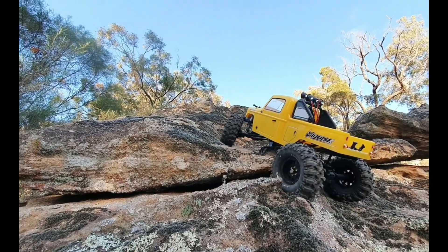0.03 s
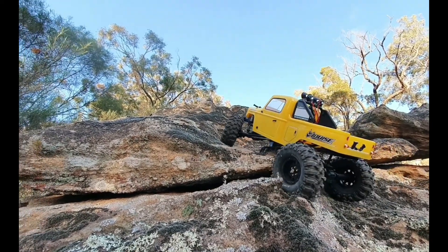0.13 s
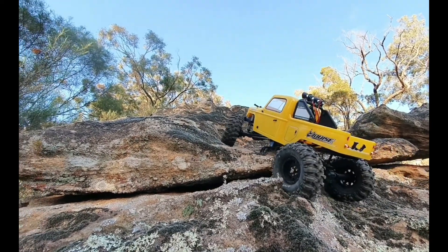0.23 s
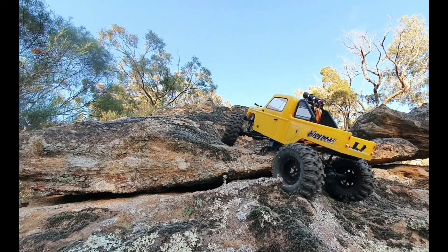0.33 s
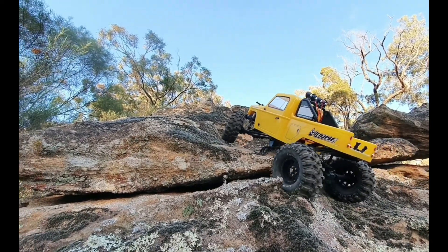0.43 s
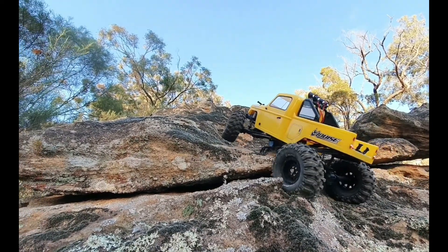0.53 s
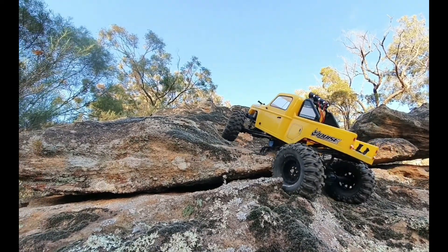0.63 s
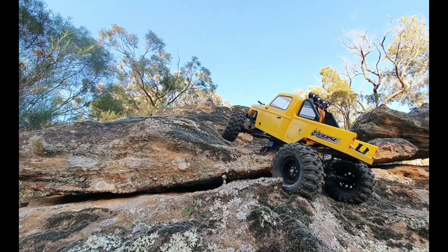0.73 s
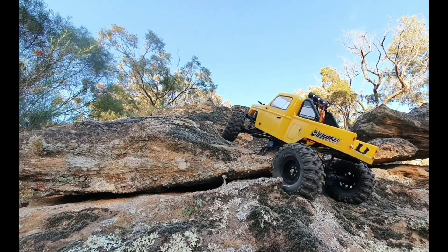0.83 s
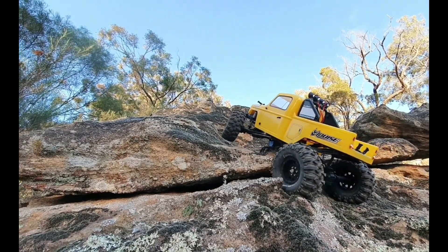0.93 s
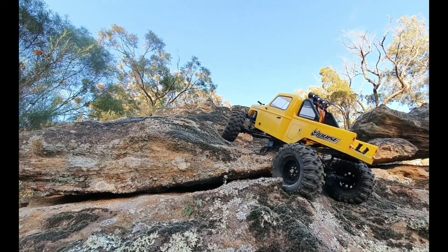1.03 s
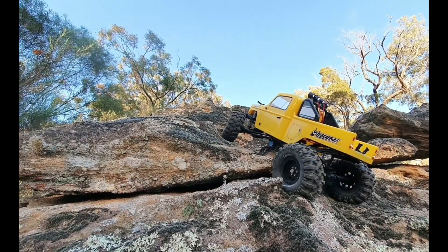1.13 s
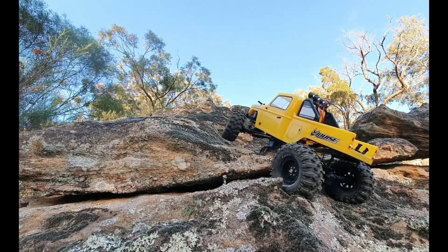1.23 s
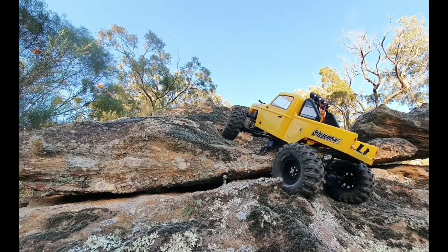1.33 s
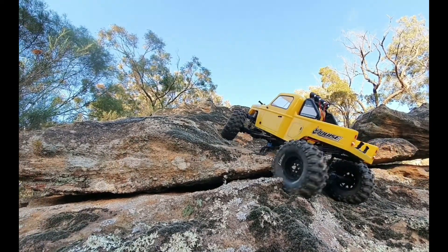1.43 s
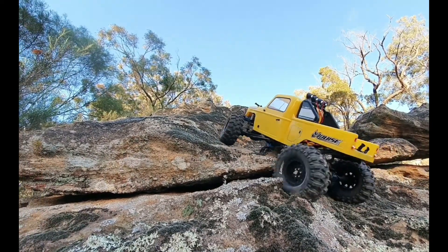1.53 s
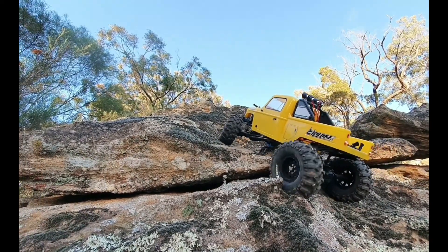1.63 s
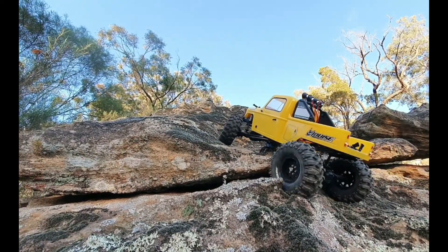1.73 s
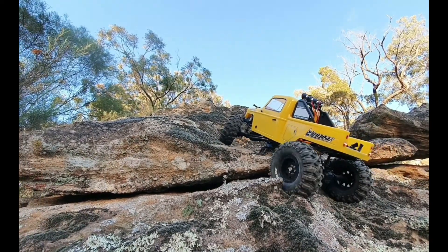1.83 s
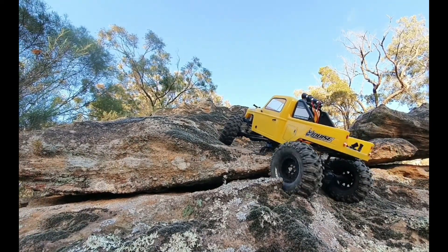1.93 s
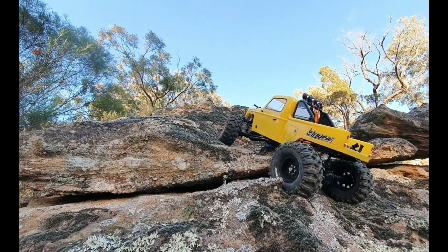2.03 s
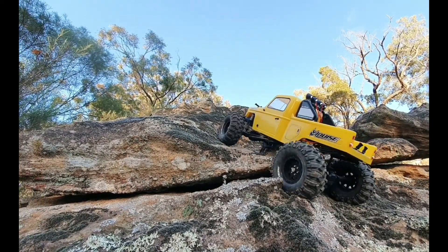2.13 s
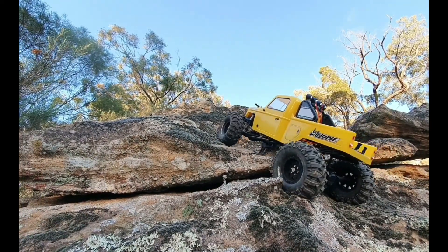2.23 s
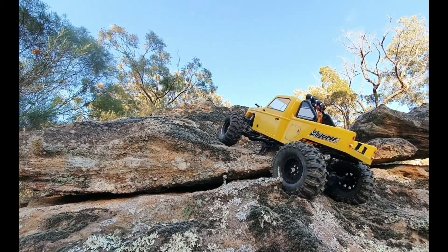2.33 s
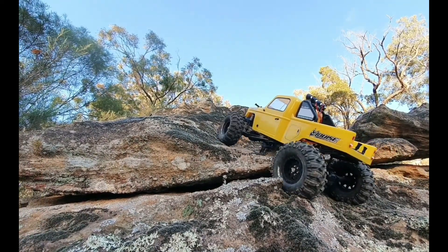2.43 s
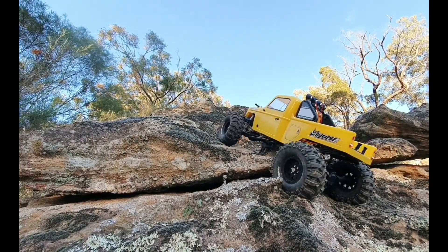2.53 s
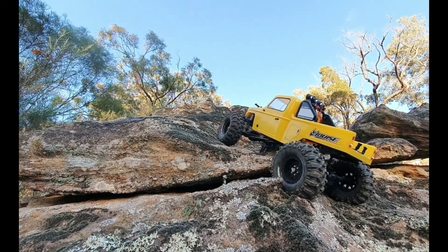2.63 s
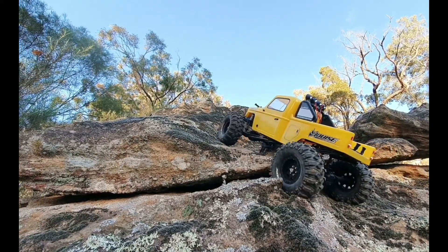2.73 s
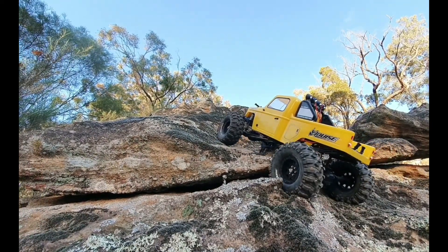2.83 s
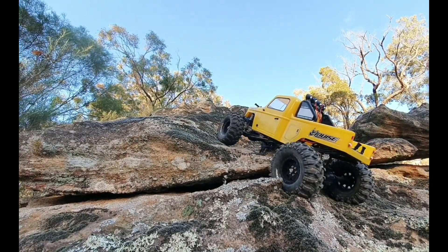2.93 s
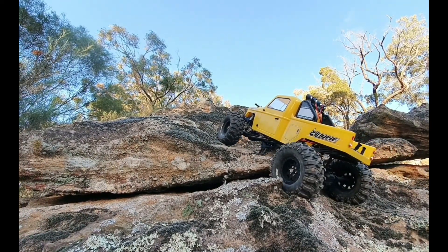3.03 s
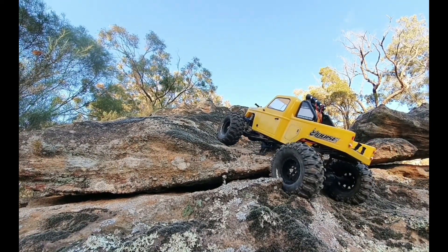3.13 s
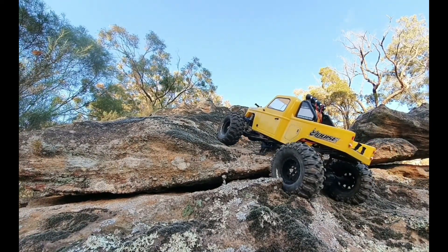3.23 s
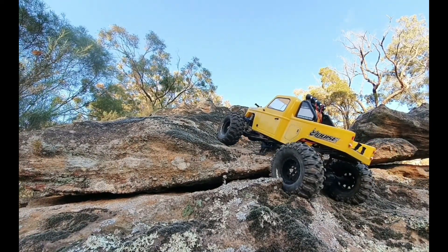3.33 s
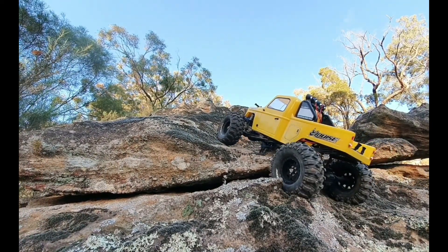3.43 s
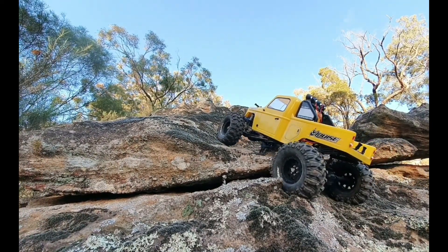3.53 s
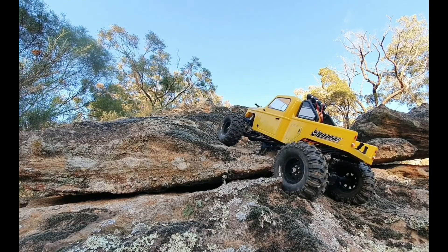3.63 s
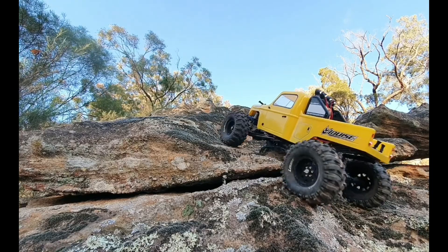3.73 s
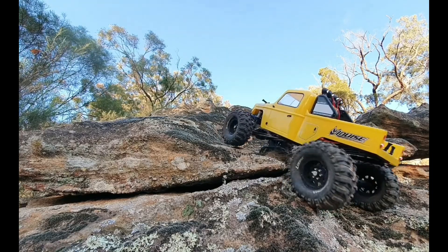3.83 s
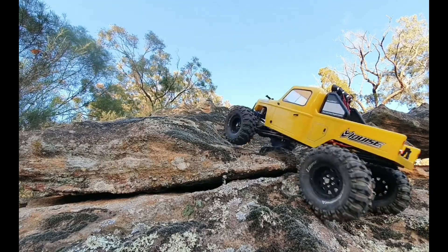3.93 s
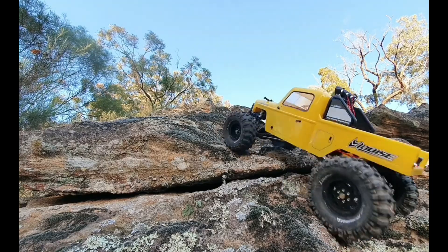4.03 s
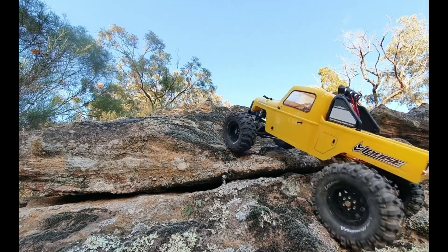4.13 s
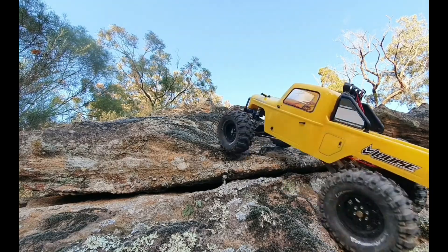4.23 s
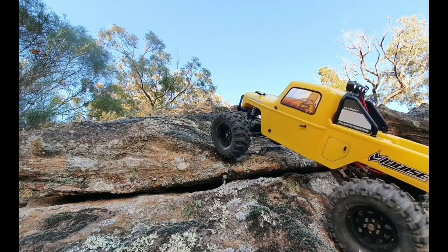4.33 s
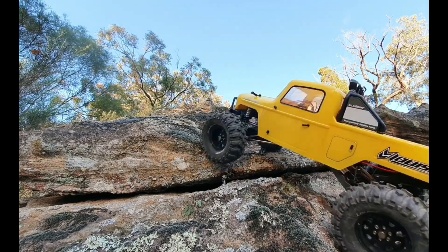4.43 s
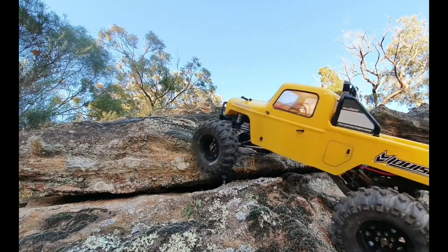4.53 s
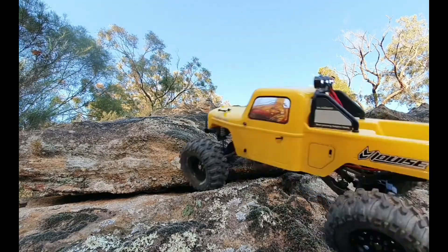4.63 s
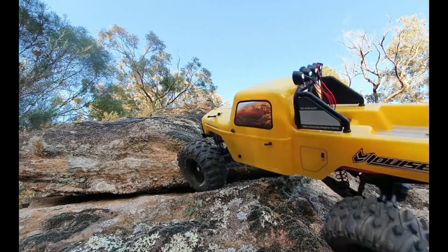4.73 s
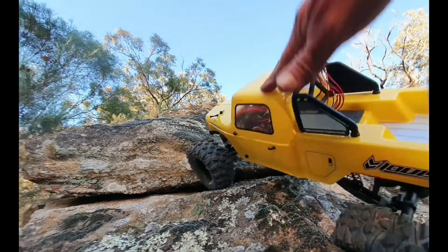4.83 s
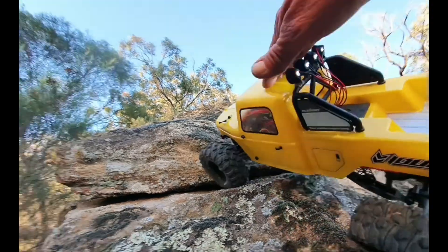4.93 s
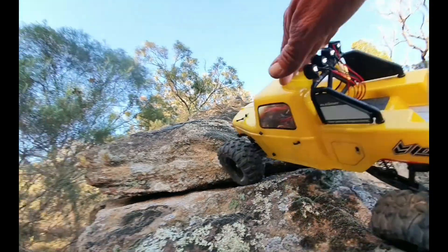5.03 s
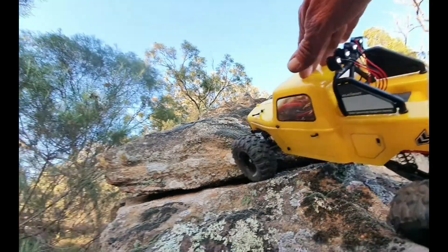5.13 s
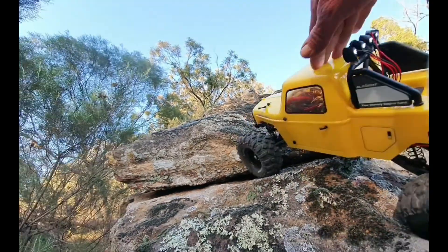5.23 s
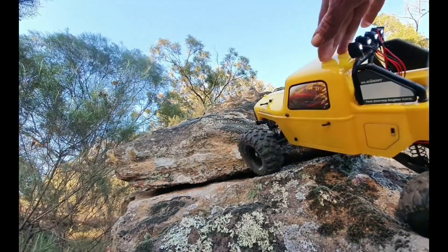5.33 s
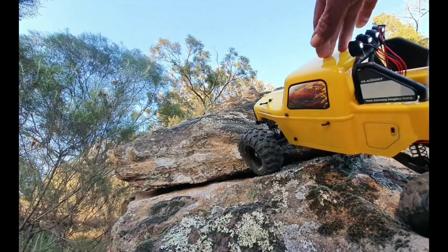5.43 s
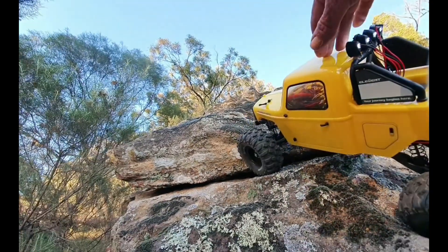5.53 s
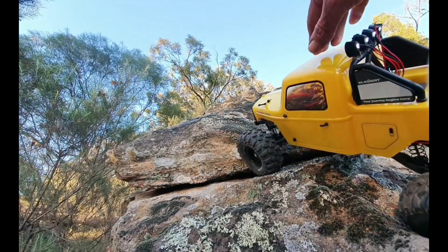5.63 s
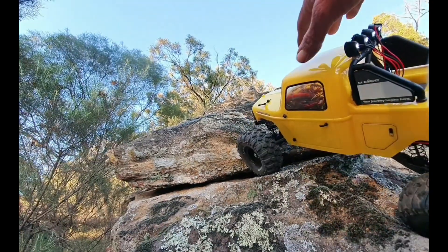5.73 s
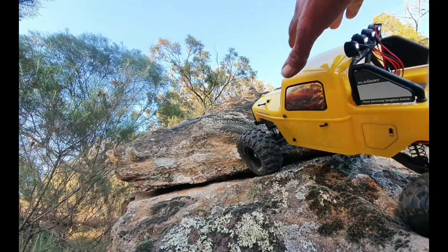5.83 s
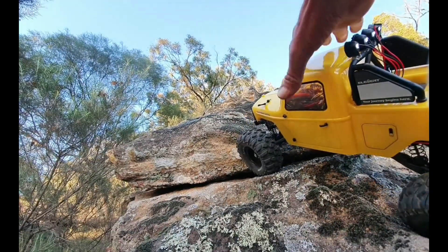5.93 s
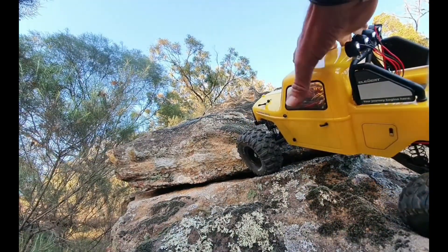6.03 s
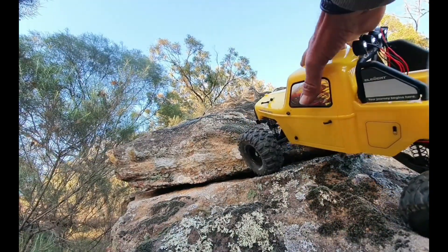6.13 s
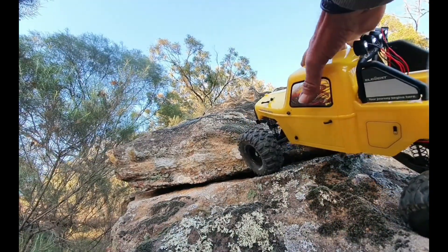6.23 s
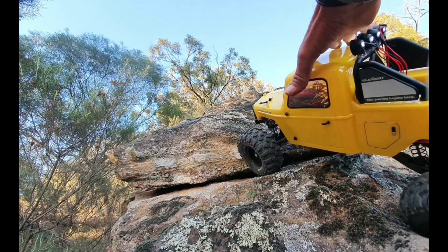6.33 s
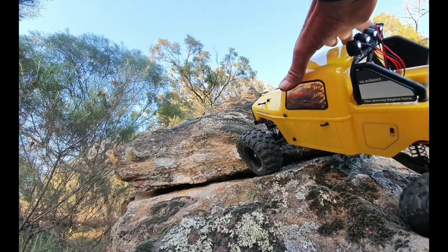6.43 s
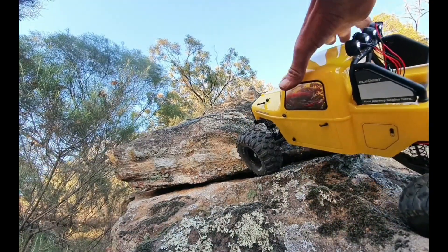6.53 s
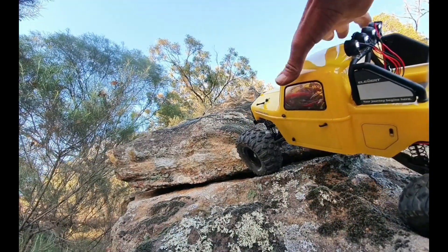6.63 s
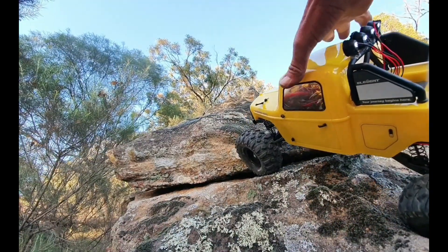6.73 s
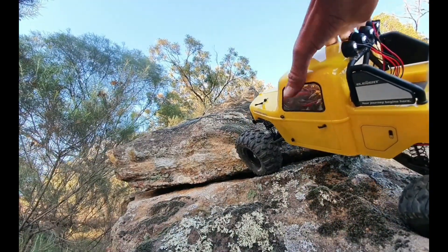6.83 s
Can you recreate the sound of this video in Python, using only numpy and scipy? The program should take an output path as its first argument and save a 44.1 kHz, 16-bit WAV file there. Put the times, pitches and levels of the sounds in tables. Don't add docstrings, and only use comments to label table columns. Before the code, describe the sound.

A model crawler truck's rubber tyres scrabble and thump on sandstone in bursts, stones cracking, then slide back into one hard plastic knock.

```python
import sys
import numpy as np
from scipy import signal
from scipy.fft import rfft, irfft, next_fast_len
from scipy.io import wavfile
from scipy.ndimage import uniform_filter1d, map_coordinates

SR = 44100
rng = np.random.default_rng(int(sys.argv[2]) if len(sys.argv) > 2 else 0)


def linear_from_db(decibels):
    return 10 ** (np.asarray(decibels, float) / 20)


def transcribe(u):
    v = np.clip(np.atleast_2d(u).T, -1, 1)
    q = np.round(v * 32767).astype(np.int16)
    wavfile.write(sys.argv[1], SR, q)


N = 303716

# (peak time [s], peak level [dB], rise [s], fall [s], harshness [dB])
CLIMB = [(.058, -57.5, 1.1, 0.11, 0), (.17, -73.5, .12, 0.34, 10), (.46, -77, 0.14, 0.71, 12.5),
         (.59, -59.5, 0.3, 0.65, 1.5), (.735, -54.5, 0.15, 0.29, 2.5), (1.545, -49.5, 0.042, 0.3, 0),
         (1.6, -46.5, 0.084, 0.5, -9), (1.7, -41, 0.16, 0.23, 4), (1.45, -76, 0.031, 0.13, -7),
         (1.8, -35, 0.14, 0.17, 4.5), (1.96, -57.5, 0.041, 0.056, 3.5), (2.02, -59, 0.064, 0.023, -7.5),
         (2.18, -55.5, 0.022, 0.31, -0.5), (2.275, -47, 0.084, .14, -3), (2.32, -51, 0.11, 0.084, 2.5),
         (2.97, -65.5, .03, 0.19, -10), (3.035, -68, 0.16, 0.17, 3.5), (1.875, -41.5, 0.039, 0.039, -0.5),
         (2.0, -81, 3.9, 4.7, 0.5)]
# (peak time [s], peak level [dB], rise [s], fall [s], harshness [dB])
SLIDE = [(3.85, -59.5, 0.075, 1, 0.5), (3.94, -58.5, 0.034, 0.41, 2), (4.018, -50, 0.087, 0.13, 0),
         (4.17, -63.5, 0.083, 0.4, 6), (4.3, -52.5, 0.12, 0.097, 2), (4.235, -59, .02, .12, 1),
         (4.41, -54.5, 0.076, 0.11, 3.5), (4.483, -49, 0.057, 0.2, 2), (4.69, -53, 0.053, 0.11, 7),
         (4.77, -38.5, 0.083, 0.056, -15), (4.81, -49.5, 0.084, 0.015, -7), (4.86, -41, 0.031, 0.12, 5.5),
         (4.93, -46.5, 0.41, 0.033, 0), (4.96, -62, .02, 0.27, 8.5), (5.067, -25.5, 0.013, 0.045, 10.5),
         (5.107, -39.5, 0.029, 0.084, 1.5), (5.24, -67, .1, 0.49, 2), (5.384, -61, 0.18, 0.091, 1),
         (5.57, -66.5, .2, 0.22, -1.5), (5.48, -70.5, .1, .1, -1), (6.33, -70, 0.14, 0.56, 1),
         (6.359, -52, 0.02, 0.079, -7), (6.482, -64, 0.14, 0.08, 1), (6.58, -79, .08, 0.27, -16)]


def unit(x):
    return x / np.sqrt(np.mean(x ** 2) + 1e-20)


def along(points, hz):
    f, v = np.transpose(points)
    return np.interp(np.log(hz + 1), np.log(f + 1), v)


def wobble(rate):
    knots = rng.standard_normal(int(N * rate / SR) + 4)
    return map_coordinates(knots, [np.arange(N) * rate / SR])


def filtered(x, response):
    m = next_fast_len(N + SR // 2)
    return irfft(rfft(x, m) * response(np.fft.rfftfreq(m, 1 / SR)), m)[..., :N]


def band(lo_hz, hi_hz, order=2):
    return lambda f: (1j * f / (lo_hz + 1j * f) * hi_hz / (hi_hz + 1j * f)) ** order


def resonance(f, centre_hz, width_hz, lift_db):
    damping = 1j * f * width_hz
    return (linear_from_db(lift_db) - 1) * damping / (centre_hz ** 2 - f * f + damping)


def noise(alike):
    a, b = rng.standard_normal((2, N))
    turn = np.arccos(np.clip(alike, -1, 1)) / 2
    common, apart = np.cos(turn) * a, np.sin(turn) * b
    return np.array([common + apart, common - apart])


def swells(rows, share=0, slope=1):
    s, db, rise, fall, extra_db = np.transpose(rows)[..., None]
    t = np.arange(0, N + 64, 64) / SR
    away = np.maximum((s - t) / np.abs(rise), (t - s) / np.abs(fall))
    each = linear_from_db(slope * db + share * extra_db - 20 * away)
    return np.interp(np.arange(N) / SR, t, 10 * np.log10((each ** 2).sum(0) + 1e-14))


def grains(s, db, hz, cycles, pan_db, lag, size, rise=0):
    t = np.arange(size) / SR
    decay = np.exp(-t * (hz / cycles)[:, None] * 2)
    wave = linear_from_db(db)[:, None] * decay * np.sin(2 * np.pi * hz[:, None] * t)
    wave *= np.hanning(2 * size)[size:] * (1 - np.exp(-t * hz[:, None] / (rise + 1e-3)))
    out = []
    for side in (1, -1):
        at = np.round(s * SR + side * lag / 2).astype(int)[:, None] + np.arange(size)
        heard = wave * linear_from_db(side * pan_db / 2)[:, None]
        out.append(np.bincount(at.clip(0, N).ravel(), heard.ravel(), N + 1)[:N])
    return np.array(out)


def swarm(count, hz, octaves, cycles, spread_db, pan_db, size):
    u, g = rng.random((count, 2)), rng.standard_normal((count, 4))
    pitch = np.clip(hz * 2 ** (octaves * g[:, 0]), 100, SR / 2.5)
    life = cycles * 2 ** (.5 * g[:, 1])
    size_db = np.minimum(-spread_db * np.log(u[:, 1]), 11)
    pan, lag = pan_db + 3 * g[:, 2], 9 + 4 * g[:, 3]
    return unit(grains(u[:, 0] * N / SR, size_db, pitch, life, pan, lag, size=size))


def bursts(rows, gain_db, pan_db, octaves, cycles, smear, count, size, rise=0):
    s, db, hz = np.repeat(np.array(rows), count, axis=0).T
    g = rng.standard_normal((len(rows), count, 4)) * (np.arange(count) > 0)[:, None]
    g = g.reshape(-1, 4)
    pitch = np.clip(hz * 2 ** (octaves * g[:, 0]), 100, 11000)
    late = smear * (1.3 + g[:, 1])
    level, lag = db + gain_db + 1.0 * g[:, 2], 9 + 1.8 * g[:, 3]
    return grains(s + late, level, pitch, cycles + 0 * s, pan_db + 0 * s, lag, size=size, rise=rise)


def singing(rows, width_hz, steady):
    out = np.zeros(N + SR)
    for s, length, hz, db in rows:
        n = round(length * SR)
        rate = width_hz * np.sqrt(hz / 2000)
        shake = steady + (wobble(rate) + 1j * wobble(rate))[:n] / 2
        tone = (shake * np.exp(2j * np.pi * hz * np.arange(n) / SR)).real
        out[round(s * SR):][:n] += linear_from_db(db + 3.5) * np.sqrt(np.hanning(n)) * tone
    return np.array([linear_from_db(-1.5) * np.roll(out[:N], 9), linear_from_db(5.5) * out[:N]])


def leaves():
    # (frequency [Hz], level per Hz [dB])
    air_colour = [(76, -32), (130, -3.5), (183, -4.5), (554, -11.5), (1080, -20.5), (4240, -26.5),
                  (10000, -38.5), (16000, -33.5)]
    hiss = unit(filtered(noise(0.089), lambda f: linear_from_db(along(air_colour, f))))
    return linear_from_db(-74 + 0.56 * wobble(2.0)) * hiss


def mount():
    # (peak time [s], hum level [dB], rise [s], fall [s], wind over hum [dB])
    shake_events = [(0, -61, .5, 1.8, -5), (.82, -50.5, 0.4, 0.61, -10), (1.15, -64, 0.34, 0.14, -1),
                    (1.45, -51, 0.13, 0.38, -12.5), (1.66, -49, 0.18, 0.14, -2.5),
                    (1.84, -43, 0.071, 0.16, -1.5), (2.07, -51.5, 0.57, 0.26, -10.5),
                    (2.3, -51.5, 0.33, 0.18, -3), (2.6, -61.5, 0.15, 0.12, 1), (2.9, -74.5, 0.37, .6, -7),
                    (3.22, -55, 0.87, 0.21, -5), (3.55, -58.5, 0.18, 0.089, -0.5),
                    (3.87, -52, 0.36, 0.28, -5), (4.5, -58, 0.92, 0.71, -3), (4.77, -39.5, 0.072, .25, 0.5),
                    (5.15, -48, 0.11, 0.11, 5), (5.4, -61.5, 0.18, 0.11, 1), (5.58, -65.5, 0.095, 0.32, 7),
                    (5.94, -79.5, 0.23, 0.28, 13.5), (6.44, -63, 0.49, 0.13, 5),
                    (6.67, -65.5, 0.21, 0.61, -2)]
    hum_db, buffet_db = swells(shake_events), swells(shake_events, share=0.99)
    via_rock_db = -9.5 + uniform_filter1d(swells(CLIMB + SLIDE), SR // 20)
    via_hand_db = -31.5 + hum_db
    rumble = linear_from_db(via_rock_db) + linear_from_db(via_hand_db)
    hum_hz = 90.1 + 1.8 * wobble(14)
    hum = np.sin(2 * np.pi * np.cumsum(hum_hz) / SR) * linear_from_db(3.2 * wobble(7.0))
    clear = np.interp(np.arange(N) / SR, [4.0, 4.2], [1, 0.3])
    hum = clear * unit(hum) + (1.18 - clear) * unit(filtered(noise(0.64), band(78, 100, order=6)))
    buffet = linear_from_db([[2.5], [-2.5]]) * unit(filtered(noise(0.79), band(38, 58, order=4)))
    handling = unit(filtered(noise(.75), lambda f: 1 / (1 + ((f - 138) / 28) ** 4)))
    hum = linear_from_db([[.6], [-.6]]) * linear_from_db(hum_db + 0.55) * hum
    return hum + linear_from_db(buffet_db + 5.5) * buffet + rumble * handling


def controller():
    # (on time [s], off time [s], whistle at on [dB], whistle at off [dB])
    throttle = [(0, 0.125, -77, -77), (.15, 0.397, -85, -78.5), (0.414, .92, -80.5, -69.5),
                (0.944, 0.991, -67, -64.5), (1.016, 1.453, -68, -71), (1.471, 1.768, -74, -59.5),
                (1.8, 2.037, -76, -77), (2.056, 2.174, -71, -100), (2.745, 3.112, -88.5, -80),
                (3.35, 3.45, -95, -95), (3.788, 3.901, -82.5, -66.5), (3.916, 4.056, -70, -81)]
    chop_hz, switch_s = 9661, 0.03
    t = np.arange(N) / SR
    pulls = []
    for on, off, on_db, off_db in throttle:
        times = [on - switch_s, on, off, off + switch_s]
        pulls.append(np.interp(t, times, [-120, on_db, off_db, -120]))
    db = np.max(pulls, 0)
    phase = 2 * np.pi * chop_hz * t + 1.3 * wobble(25)
    beat = 1 + 0.23 * np.sin(2 * np.pi * 170 * t + 3 * wobble(7.4))
    left = linear_from_db(-3.5) * np.sin(phase - 1.3 + 0.5 * wobble(3.7))
    right = linear_from_db(3.5) * np.sin(phase)
    tone = beat * np.array([left, right])
    fuzz = unit(filtered(noise(0.27), lambda f: 1 / (1 + ((f - chop_hz) / 400) ** 2)))
    return linear_from_db(db + 6.5 + 1.5 * wobble(40)) * tone + linear_from_db(0.41 * db - 50.5) * fuzz * (db > -105)


def tyres():
    # (frequency [Hz], width [Hz], level over flat [dB])
    chassis_modes = [(1800, 280, -0.5), (2660, 300, 2.5), (3366, 260, 1.5), (4870, 630, -0.5),
                     (6360, 69, 4)]
    slips = CLIMB + SLIDE
    thump_db = swells(slips)
    scrape_db = -21.5 + swells(slips, share=0.7, slope=0.82)
    grit_db = -33 + swells(slips, share=0.8, slope=0.66)
    judder = 1.6 * wobble(30)
    patches = 2.0 * np.array([wobble(45), wobble(45), wobble(45)])
    fine = judder + 2.0 * wobble(70)
    right = linear_from_db([[-1.8], [1.8]])

    def frame(f):
        return 1 + sum(resonance(f, *mode) for mode in chassis_modes)

    lugs = swarm(count=3500, hz=600, octaves=0.68, cycles=2.2, spread_db=1.0, pan_db=-4, size=600)
    lugs = unit(filtered(lugs + 0.76 * right * noise(0.41), band(298, 1900)))
    rub = swarm(count=9000, hz=2121, octaves=0.83, cycles=2, spread_db=2.0, pan_db=-5.0, size=200)
    rub = rub + 0.59 * right * noise(0.033)
    rub = unit(filtered(rub, lambda f: frame(f) * band(1100, 4200)(f)))
    grit = swarm(count=12000, hz=7106, octaves=0.9, cycles=1.1, spread_db=2.0, pan_db=-9.5, size=60)
    grit = grit + 1.0 * right * noise(0.04)
    grit = unit(filtered(grit, lambda f: frame(f) * band(4200, 7000)(f)))
    out = linear_from_db(thump_db + judder + patches[0] - 1.0) * lugs
    out += linear_from_db(scrape_db + fine + patches[1] + 3.5) * rub
    return out + linear_from_db(grit_db + fine + patches[2] + 4.0) * grit


def sand():
    # (time [s], peak level [dB], frequency [Hz])
    snap_events = [(.034, -58, 3000), (.0545, -37.5, 3040), (.0765, -57, 6000), (.147, -55, 5000),
                   (.1745, -58, 5000), (.185, -55, 4000), (.2025, -50, 5030), (.2712, -52.5, 4500),
                   (.288, -57, 5000), (.297, -53, 9000), (.4185, -64, 3000), (.422, -56, 6000),
                   (.462, -66, 5500), (.52, -53, 9000), (.613, -50, 9000), (.68, -62, 6600),
                   (.7128, -49, 9000), (.727, -35.5, 8020), (.76, -58, 6480), (.815, -56, 6000),
                   (.83, -45, 10000), (.887, -57, 11010), (.902, -59, 11000), (1.569, -45.5, 3500),
                   (2.39, -56, 3500), (5.21, -57, 2400), (5.3, -62, 7000), (5.353, -58, 3000),
                   (5.38, -55, 6540), (5.55, -59, 2000), (5.6, -65, 6500), (5.71, -66, 1200),
                   (4.354, -50, 1800), (4.822, -48, 4000)]
    return bursts(snap_events, gain_db=2.5, pan_db=-9.5, octaves=0.35, cycles=2.9, smear=0.00049,
                  count=6, size=120, rise=0.84)


def contacts():
    # (time [s], peak level [dB], frequency [Hz])
    lug_events = [(0.052, -47, 533), (0.68, -49, 474), (0.769, -45.5, 495), (0.801, -47, 519),
                  (1.535, -45, 394), (1.564, -51, 507), (1.602, -28, 554), (1.664, -39, 600),
                  (1.741, -26, 817), (1.758, -18, 690), (1.799, -26, 471), (2.28, -48, 500),
                  (3.838, -50, 810), (3.943, -33.5, 716), (3.9893, -29, 429), (4.171, -37, 422),
                  (4.229, -43.5, 940), (4.301, -39, 387), (4.263, -48.5, 377), (4.549, -49.5, 458),
                  (4.469, -38, 405), (4.674, -47, 824), (4.717, -35, 433), (4.745, -24.5, 435),
                  (4.8, -22.5, 428), (4.855, -28, 448), (4.894, -26.5, 512), (4.921, -29.5, 412),
                  (4.955, -40, 396)]
    # (time [s], peak level [dB], frequency [Hz])
    settle_events = [
        (5.105, -26, 315),
        (5.264, -49, 740),
        (5.354, -45.5, 274),
        (5.574, -56, 486),
        (6.307, -56.5, 604),
        (6.352, -45.5, 317),
        (6.486, -49, 285),
    ]
    # (time [s], peak level [dB], frequency [Hz])
    crack_events = [(0.038, -44, 2860), (0.0525, -41, 3020), (0.7115, -49, 3600), (0.7257, -41, 3110),
                    (1.5254, -47.5, 3810), (1.543, -50, 3450), (1.563, -38.5, 2520), (1.6836, -39, 2650),
                    (1.735, -31.5, 2690), (1.7519, -28.5, 4200), (1.8177, -27, 4230), (1.8854, -37, 2720),
                    (1.9634, -42.5, 3270), (2.2794, -39, 5100), (2.333, -39.5, 3000), (3.9454, -39.5, 2780),
                    (4.4094, -50, 3800), (4.466, -38.5, 4660), (4.7547, -38.5, 3700), (4.801, -28, 5300),
                    (4.8566, -35, 3620), (4.8676, -38, 4350), (4.9014, -36, 3516), (5.0612, -29, 2200),
                    (5.0669, -27.5, 2492), (5.1048, -33, 2780), (5.1464, -36.5, 3150), (5.2826, -46, 2430)]
    # (time [s], peak
    # level [dB], frequency [Hz])
    further_cracks = [(5.052, -45, 3100), (5.055, -42, 2100), (5.058, -38, 1650), (1.794, -37, 3000),
                      (4.92, -39, 2000), (4.19, -54, 2000), (4.801, -29, 5500), (.9935, -58, 3600),
                      (5.328, -56, 6000), (5.407, -56, 3000), (6.38, -55, 2400), (6.411, -57, 2400),
                      (6.44, -58, 5500)]
    # (time [s], peak level [dB])
    tick_events = [(0.075, -52), (0.1, -52.5), (.154, -60), (0.1962, -57), (0.27, -57), (.491, -48.5),
                   (0.587, -55), (1.6013, -66), (1.918, -46), (3.845, -52), (3.991, -54), (4.1686, -50.5),
                   (4.191, -52), (4.231, -55), (4.289, -58), (4.3823, -49), (4.4345, -52), (4.665, -49),
                   (4.6833, -61), (5.188, -50), (5.2619, -47.5), (5.314, -51), (5.374, -51),
                   (5.5187, -53.5), (5.5741, -51)]
    dull = lug_events + settle_events
    thumps = bursts(dull, gain_db=0.0, pan_db=-2.0, octaves=0.0499, cycles=3.4, smear=0.001524,
                    count=1, size=700, rise=0.18)
    bright = [(s, db, 1.9 * hz) for s, db, hz in dull]
    edges = bursts(bright, gain_db=-11.5, pan_db=-2.5, octaves=0.8, cycles=3.3, smear=.0015,
                   count=3, size=400, rise=.5)
    scatter = rng.standard_normal(len(tick_events))
    ticks = [(s, db, 3850 * 2 ** (0.26 * g)) for (s, db), g in zip(tick_events, scatter)]
    cracks = bursts(crack_events + further_cracks + ticks, gain_db=0.5, pan_db=-5.0, octaves=0.5,
                    cycles=3.43, smear=0.00086, count=8, size=200, rise=.7)
    return thumps + edges + cracks


def pops():
    # (time [s], peak level [dB], frequency [Hz], length [cycles])
    flick_events = [(.0392, -45, 2400, 1.4), (.0549, -39, 2600, 1.4), (.5878, -46, 1100, 1.2),
                    (.6476, -41, 600, .8), (.7305, -38, 650, 1.2), (1.5689, -34, 1000, 1.2),
                    (1.576, -37, 900, .8), (1.686, -23, 1050, 1), (1.7262, -31, 900, .8),
                    (1.805, -29, 480, 2.5), (1.872, -30, 450, 2), (2.265, -41, 400, .7),
                    (2.277, -39, 350, .8), (2.293, -40, 400, .7), (4.3325, -42, 520, 2.5),
                    (4.3543, -38, 1000, .7), (4.447, -42, 900, .8), (4.6926, -40, 900, .9),
                    (4.8028, -22, 900, 1.3)]
    out, t = np.zeros((2, N)), np.arange(-300, 300) / SR
    for s, db, hz, cycles in flick_events:
        flick = linear_from_db(db) * np.exp(-2 * (t * hz / cycles) ** 2) * np.cos(2 * np.pi * hz * t)
        for side, (lag, pan_db) in enumerate([(4, -1.0), (-4, 2.5)]):
            out[side, round(s * SR) - 300 + lag:][:len(t)] += linear_from_db(pan_db) * flick
    return out


def ledge(x):
    # (frequency [Hz], time to fall 60 dB [s])
    echo_life = [(200, 0.039), (1500, 0.044), (10000, 0.028)]
    hz, t, z = signal.stft(rng.standard_normal((2, SR // 8)), SR, nperseg=128)
    fade = linear_from_db(-60 * t / along(echo_life, hz)[:, None])
    tail = signal.istft(z * fade, SR, nperseg=128)[1]
    late = np.pad(x, ((0, 0), (40, 0)))
    return signal.fftconvolve(late, tail / np.linalg.norm(tail[0]), axes=1)[:, :N]


def groans():
    # (time [s], length [s], frequency [Hz], level [dB])
    drag_events = [(1.79, .12, 930, -44), (1.79, .11, 520, -41), (1.6, .07, 1350, -54),
                   (1.55, .05, 3450, -59), (1.7, .07, 900, -48), (3.86, .03, 2650, -65),
                   (4.74, .045, 460, -38), (4.9, .045, 1780, -53), (4.29, .055, 430, -53),
                   (4.22, .08, 1150, -65), (5.1, .04, 340, -40), (5.4, .04, 1300, -68),
                   (2.95, .1, 800, -70), (2.99, .08, 2600, -76), (6.345, .06, 720, -63),
                   (6.27, .09, 4700, -86), (6.45, .07, 6000, -79), (2.155, .14, 1730, -61),
                   (2.16, .09, 2430, -62), (2.19, .12, 3820, -65), (.42, .08, 6500, -74),
                   (6.48, .04, 600, -67), (4.58, .04, 1750, -66), (.58, .28, 2750, -68),
                   (4.84, .1, 430, -41), (1.7, .14, 400, -43), (3.99, .07, 3000, -62), (.6, .22, 1200, -64),
                   (4.88, .06, 2200, -54), (.68, .12, 3600, -66), (4.29, .06, 160, -52),
                   (5.35, .06, 160, -54), (3.84, .07, 1750, -66), (4.05, .03, 3700, -66)]
    return singing(drag_events, width_hz=300, steady=0.46)


def gears():
    # (time [s], length [s], frequency [Hz], level [dB])
    strain_events = [(1.54, .16, 2700, -52), (1.6, .1, 3400, -54), (1.699, .21, 1800, -53),
                     (2.164, .061, 1800, -60), (2.165, .07, 5150, -63), (2.28, .055, 5050, -60),
                     (3.858, .07, 1150, -61), (3.995, .06, 1740, -60), (4.02, .05, 1203, -57),
                     (4.015, .045, 2450, -57), (4.467, .07, 447, -50), (5.109, .05, 3260, -57)]
    return singing(strain_events, width_hz=260, steady=0.59)


def spin():
    # (peak time [s], peak level [dB], rise [s], fall [s], unused)
    hiss_events = [
        (2.245, -54, .1, .13, 0),
        (2.3, -59, .08, .06, 0),
    ]

    def bright(f):
        return band(4500, 12500, order=3)(f) / (1 + (f / 14200) ** 16)

    level_db = swells(hiss_events) + 1.3 * wobble(90) + [[-2], [2]]
    return linear_from_db(level_db) * unit(filtered(noise(0.14), bright))


def squeal():
    # (partial number, level [dB])
    rubber_partials = [(1, -9), (2, -12), (3, -2), (4, -4), (5, -4), (6, -9), (7, -13)]
    # (peak time [s], peak level [dB], rise [s], fall [s], unused)
    squeal_events = [
        (2.213, -59, .015, .3, 0),
        (2.283, -55, .07, .04, 0),
    ]
    fastest_s, top_hz, sag_hz_per_s2 = 2.247, 1913, 130000
    t = np.arange(N) / SR
    hz = np.clip(top_hz - sag_hz_per_s2 * (t - fastest_s) ** 2, 900, None)
    turns = np.cumsum(hz * (1 + .027 * wobble(1500))) / SR
    stack = 0
    for k, level in rubber_partials:
        stack = stack + linear_from_db(level + 3.7 * wobble(300)) * np.sin(2 * np.pi * k * turns)
    sings = np.clip((hz - 1560) / 200, 0, 1)
    stack = linear_from_db(swells(squeal_events) + 9.0) * sings * stack
    stack = filtered(stack, lambda f: 1 + resonance(f, centre_hz=4950, width_hz=240, lift_db=13))
    return np.array([linear_from_db(-1.5) * np.roll(stack, 7), linear_from_db(1.5) * stack])


def birds():
    # (time [s], length [s], frequency [Hz], level [dB])
    call_events = [(2.58, 0.083, 4470, -84), (2.691, 0.11, 4400, -82), (2.865, .05, 4600, -85),
                   (3.177, 0.062, 4500, -79), (3.286, 0.18, 4230, -81.5), (3.5, 0.11, 4560, -82),
                   (3.624, 0.13, 4340, -81), (2.642, 0.031, 2400, -79), (3.27, 0.029, 2500, -81),
                   (3.3, .07, 2800, -83.5)]
    out = np.zeros((2, N))
    white, t = noise(0.065) * linear_from_db(2.1 * wobble(40)), np.arange(N) / SR
    for s, length, hz, db in call_events:
        gate = np.clip(np.minimum(t - s, s + length - t) / .012 + .5, 0, 1)
        start = round((s - .1) * SR)
        part = slice(start, start + SR // 2)
        sos = signal.butter(2, [hz * .88, hz * 1.13], "bandpass", fs=SR, output="sos")
        out[:, part] += linear_from_db(db) * gate[part] * unit(signal.sosfilt(sos, white[:, part]))
    return out


def knock():
    # (time [s], body level [dB], body life [cycles], rim level [dB])
    blow_events = [
        (5.0586, -23, 10, -40.5),
        (5.0617, -14, 8, -34),
        (5.0632, -12, 6, -27),
        (5.0679, -6, 1.1, -25.5),
        (5.0746, -30, 2, -31.5),
    ]
    # (frequency [Hz], level [dB], life [cycles])
    rim_modes = [(6190, 0.91, 25), (2720, 0.91, 18)]
    # (time [s], peak level [dB], direction [+1 or -1])
    push_events = [
        (5.052, -30.5, -1),
        (5.0628, -21, -1),
        (5.0681, -21, 1),
    ]
    s, db, cycles, rim_db = np.transpose(blow_events)
    pan_db, lag = -4.5 + 0 * s, 9 + 0 * s
    shell = grains(s, db, 640 + 0 * s, cycles, pan_db, lag, size=480)
    for hz, level, life in rim_modes:
        shell += grains(s, rim_db + level, hz + 0 * s, life + 0 * s, pan_db, lag, size=340)
    t = np.arange(N) / SR
    ring = 0
    for s, db, way in push_events:
        fade = linear_from_db(db - 60 * np.clip(t - s, 0, None) / 0.2) * (t > s)
        ring = ring + np.sign(way) * fade * np.sin(2 * np.pi * 95 * (t - s))
    return shell + ring


def scene():
    hits, blow = contacts() + pops(), knock()
    echo = ledge(filtered(linear_from_db(-6.0) * hits + linear_from_db(-13.0) * blow, band(300, 15000, order=1)))
    truck = tyres() + hits + blow + echo + gears() + squeal() + controller()
    truck = truck + groans() + spin() + sand()
    return truck + mount() + leaves() + birds()


def band_limit(x):
    return signal.sosfilt(signal.butter(12, 16340, fs=SR, output="sos"), x)


def record(dry):
    top_hz = 15830
    mix = filtered(dry, lambda f: (f < top_hz) * band(36, 60000)(f))
    return band_limit(mix)


dry = scene()
out = record(dry)
transcribe(out)
```